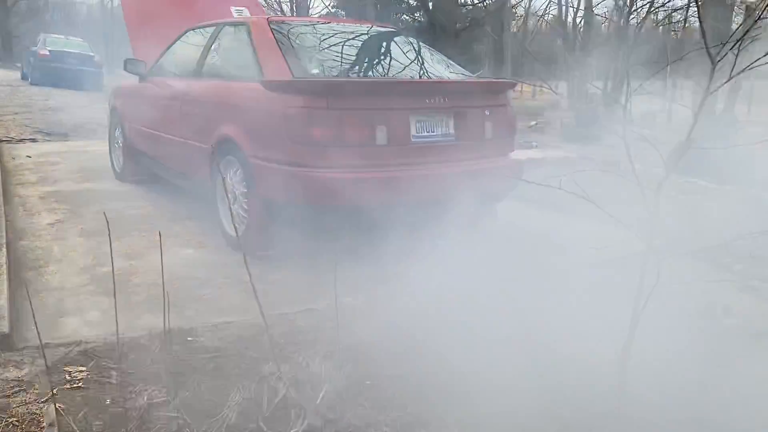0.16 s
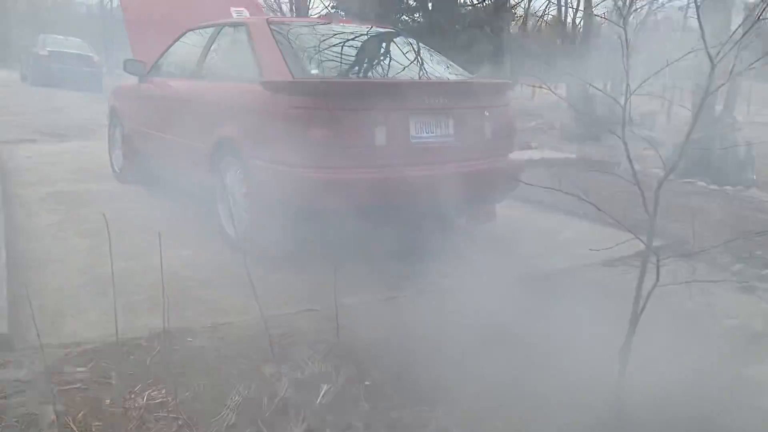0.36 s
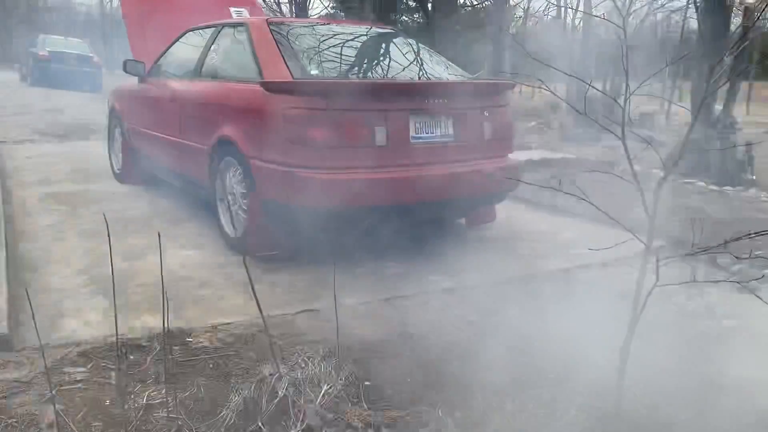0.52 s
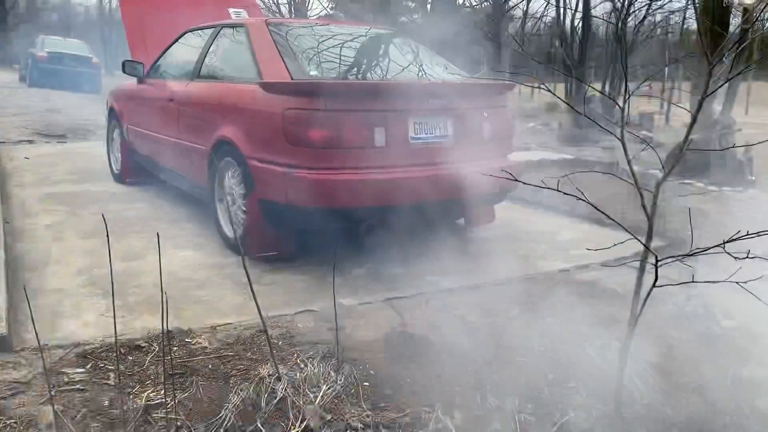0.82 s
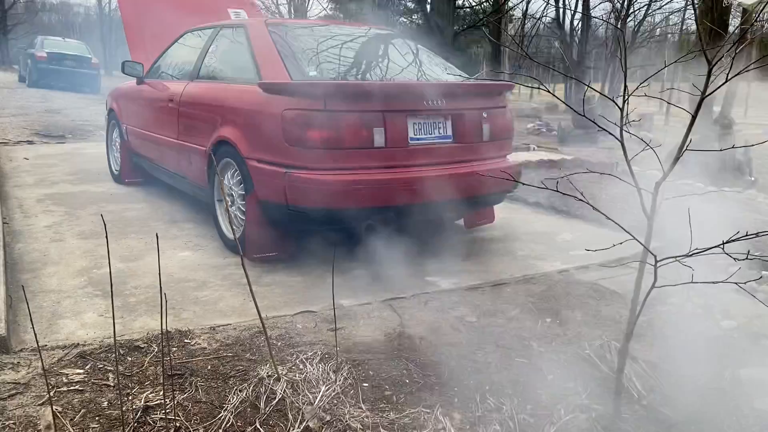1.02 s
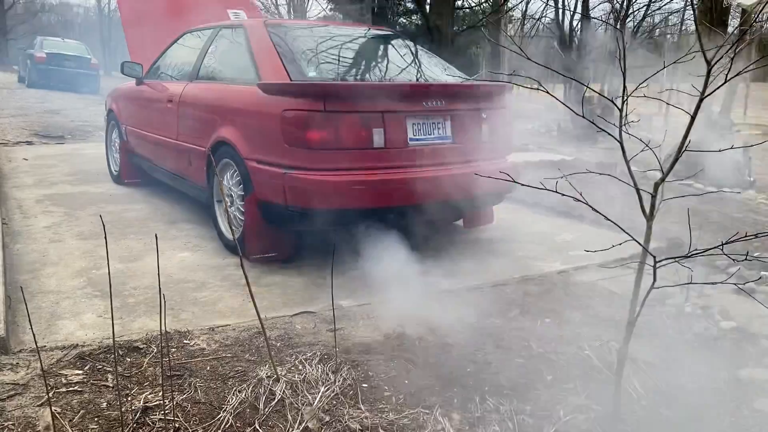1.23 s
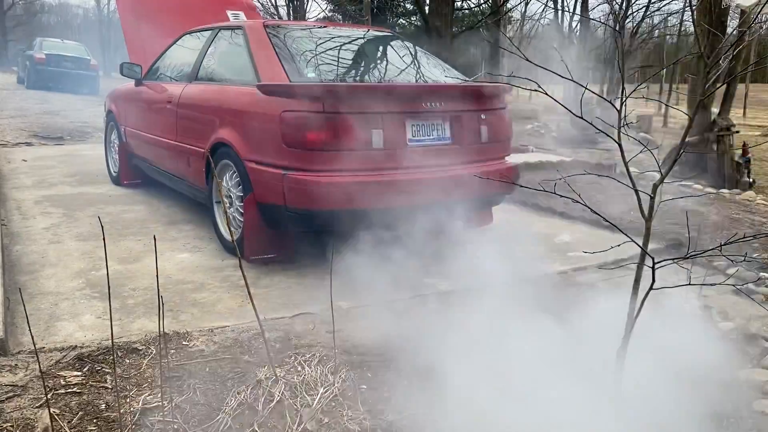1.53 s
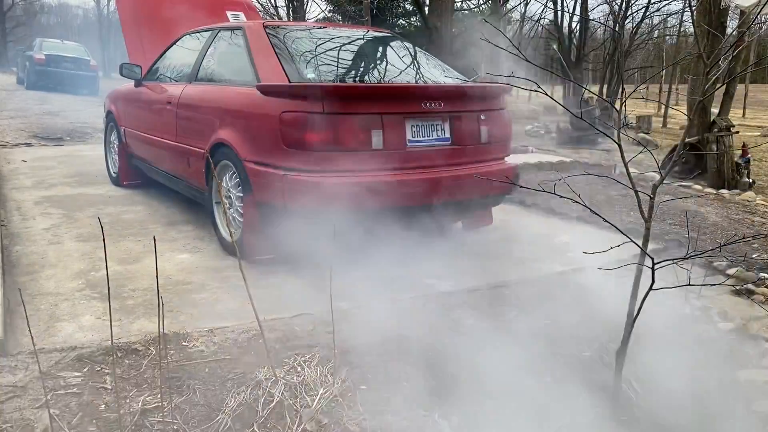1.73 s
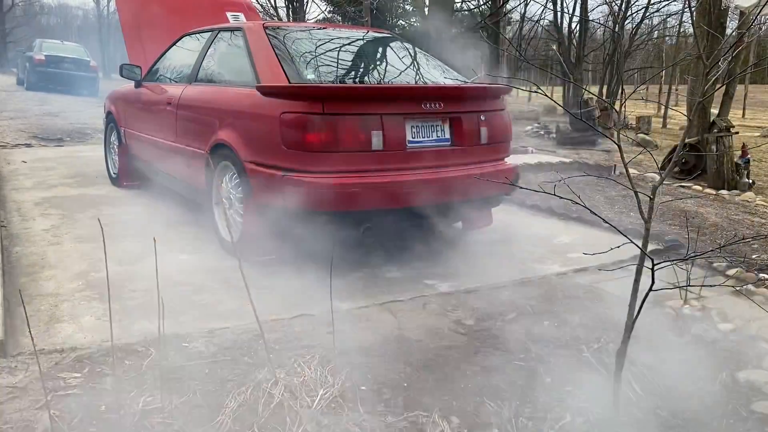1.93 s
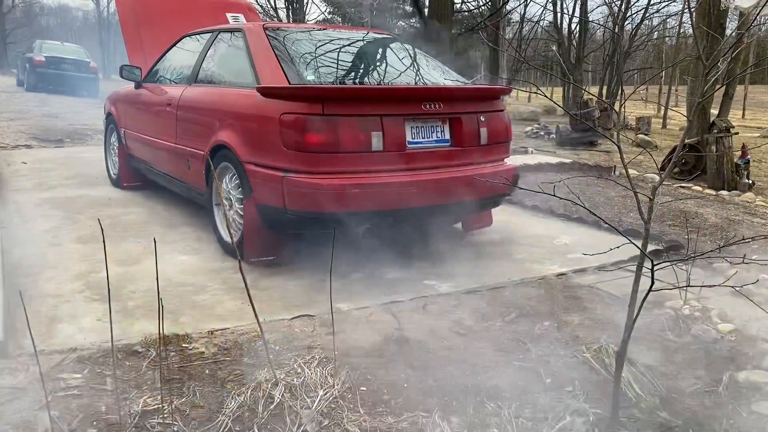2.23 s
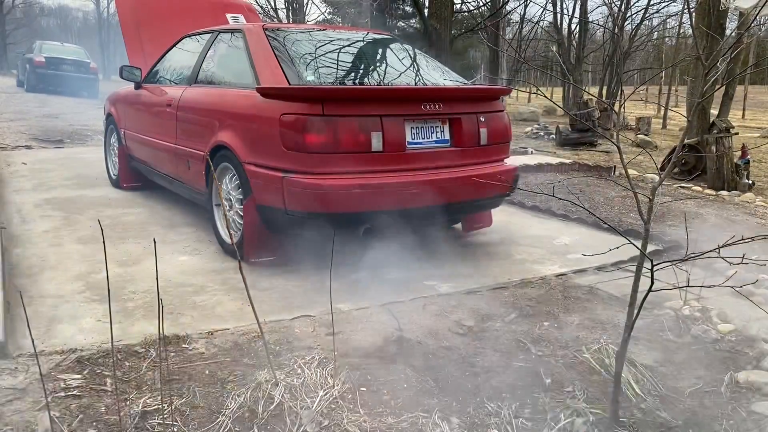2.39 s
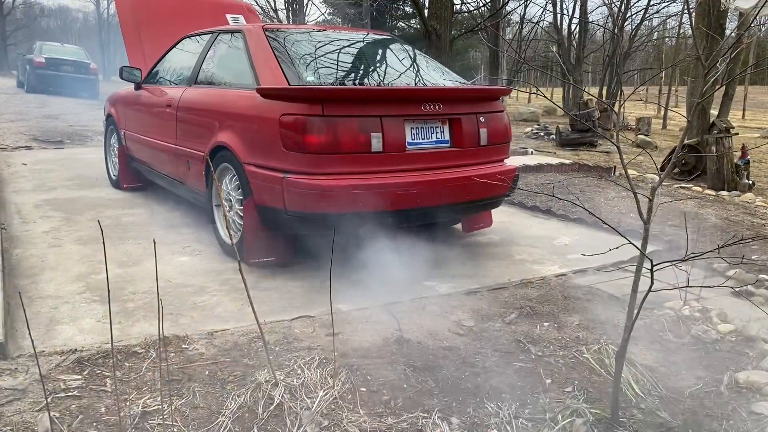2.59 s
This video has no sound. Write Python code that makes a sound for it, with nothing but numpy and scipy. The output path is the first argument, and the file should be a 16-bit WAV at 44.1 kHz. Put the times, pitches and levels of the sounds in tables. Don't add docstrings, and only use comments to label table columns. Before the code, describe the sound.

A five-cylinder car engine revs twice outdoors, its deep exhaust booming, crackling and popping behind the car

```python
import sys
import numpy as np
from scipy import signal
from scipy.fft import rfft, irfft, next_fast_len
from scipy.io import wavfile
from scipy.ndimage import uniform_filter1d, map_coordinates

SR = 44100
rng = np.random.default_rng(int(sys.argv[2]) if len(sys.argv) > 2 else 0)


def amplitude_ratio(level_db):
    exponent = np.asarray(level_db, float) / 20
    return 10 ** exponent


def store_pcm(level_fs):
    pcm = np.round(np.clip(level_fs, -1, 1) * 32767).astype(np.int16)
    wavfile.write(sys.argv[1], SR, np.atleast_2d(pcm).T)


N = 121275
CYLINDERS = 5

# time_s, firing_rate_hz, boom_db, overtone_db, rasp_db, burble_db
ENGINE = [(0, 124.2, -7.5, -20.5, -33, -17.5), (.15, 136, -8.5, -14, -36.5, -23.5),
          (0.329, 152.5, -10, -21.5, -40, -18.5), (.54, 171.2, -8, -18, -40, -18.5),
          (0.63, 175.8, -15, -15, -51, -19.5), (.77, 169.1, -20, -22.5, -57, -18.5),
          (.86, 158.1, -15, -28.5, -52.5, -22.5), (1.001, 147.2, -10.5, -30.5, -52, -25.5),
          (1.202, 133.2, -11.5, -23, -59.5, -30), (1.314, 123.3, -30.5, -32.5, -65.5, -39.5),
          (1.341, 120.5, -19, -26.5, -39.5, -22.5), (1.479, 126.6, -7, -17.5, -40, -18),
          (1.68, 140.7, -9, -17, -39, -20), (2.05, 169, -9.5, -21, -37.5, -19),
          (2.152, 173.8, -16, -13, -54, -19), (2.301, 161.6, -22.5, -22, -57, -22),
          (2.439, 150.4, -10.5, -30.5, -55.5, -24.5), (2.75, 125.9, -11.5, -23, -57, -30)]
# pitch_hz, width_hz, level_db
PIPE = [(67.6, 52, -5), (134, 42, -19), (195, 22, -12.5), (273.5, 18, -10.5), (347, 34, -2.5), (553, 67, 0),
        (606.6, 68, 1), (745, 32.3, 6), (843, 121, -2.5), (1034, 110, -9.5), (1270, 204, -11)]
# pitch_hz, width_hz, level_db
TAIL = [(741, 66, 19.5), (868, 170, 8.5), (986, 100, 1), (1317, 133, 13), (1992, 86, 12), (2686, 187, 6.5),
        (2945, 280, -1.5), (3480, 444, -1.5), (4790, 870, -12), (5150, 180, -26.5), (5546, 240, -10),
        (6420, 92, -11.5), (8200, 6000, -19.5)]
# pitch_hz, level_db
ORDER_PIPE = [(60, -0.5), (200, 3.5), (235, -7.5), (280, 0.5), (350, -3), (440, -8), (520, -2), (680, -9)]


def unit(x):
    return x / np.sqrt(np.mean(x ** 2) + 1e-20)


def along(points, hz):
    f, v = np.transpose(points)
    return np.interp(np.log(hz + 1), np.log(f + 1), v)


def wobble(rate):
    knots = rng.standard_normal(int(N * rate / SR) + 4)
    return map_coordinates(knots, [np.arange(N) * rate / SR])


def filtered(x, response):
    x, edge = np.asarray(x), 2000
    x = np.pad(x, [(0, 0)] * (x.ndim - 1) + [(edge, edge)], "reflect", reflect_type="odd")
    x = x * signal.windows.tukey(N + 2 * edge, 2 * edge / (N + 2 * edge))
    m = next_fast_len(N + SR // 2)
    return irfft(rfft(x, m) * response(np.fft.rfftfreq(m, 1 / SR)), m)[..., edge:edge + N]


def resonant(x, peaks):
    def response(f):
        total = 0
        for k, (center, width, db) in enumerate(peaks):
            peak = 1j * f * width / (center ** 2 - f ** 2 + 1j * f * width)
            total = total + (-1) ** k * amplitude_ratio(db) * peak
        return total
    return filtered(x, response)


def puffs(blows, t60):
    t = np.arange(SR // 20) / SR
    shape = amplitude_ratio(-60 * t / t60) * (1 - np.exp(-t / 0.00089))
    return np.abs(signal.fftconvolve(blows, shape)[:N]) * rng.standard_normal(N)


def yard(x):
    # pitch_hz, t60_s
    fading = [(200, 0.13), (2000, 0.18), (10000, 0.019)]
    # pitch_hz, level_db
    loudness = [(200, -30), (700, -24), (2000, -16), (6000, -10)]
    hz, t, z = signal.stft(rng.standard_normal((2, SR // 2)), SR, nperseg=256)
    tail = signal.istft(z * amplitude_ratio(-60 * t / along(fading, hz)[:, None]), SR, nperseg=256)[1]
    tail = tail / np.linalg.norm(tail[0])
    late = np.pad(x, (300, 0))[None]
    wet = signal.fftconvolve(late, tail, axes=1)[:, :N]
    return filtered(wet, lambda f: amplitude_ratio(along(loudness, f)))


def ground(x):
    echo_s, left_lag_s = .00143, .00005
    # pitch_hz, level_db
    direct_left = [(350, 0.2), (600, 0), (1000, -8.5), (1500, -3), (4500, -4), (7000, -14)]
    echo_left = [(150, -30), (450, -13), (700, -6.5), (1500, -4), (4500, -6), (7000, -9)]
    echo_right = [(150, -30), (450, -11), (700, -4.5), (1500, -5), (4500, -7), (7000, -10)]

    def response(f):
        echo = np.exp(-2j * np.pi * f * echo_s)
        left = amplitude_ratio(along(direct_left, f)) - amplitude_ratio(along(echo_left, f)) * echo
        right = 1 - amplitude_ratio(along(echo_right, f)) * echo
        return np.array([left * np.exp(-2j * np.pi * f * left_lag_s), right])
    return filtered(x, response)


def bay():
    # pitch_hz, level_db
    clatter = [(600, -37), (1500, -2.5), (4000, -3.5), (6000, -4), (8000, -7), (15000, -12)]
    s, hz, boom_db = np.transpose(ENGINE)[:3]
    hiss = filtered(rng.standard_normal((2, N)), lambda f: amplitude_ratio(along(clatter, f)))
    effort_db = 0.1627 * (hz - 150) + 0.25 * (boom_db + 16)
    effort_db = np.interp(np.arange(N) / SR, s, effort_db)
    return amplitude_ratio(-45 + effort_db + 2.7 * wobble(77)) * unit(hiss)


def blows_at(events, gain_db=0):
    blows = np.zeros(N)
    for s, db in events:
        blows[round(s * SR)] = amplitude_ratio(db + gain_db)
    return blows


def thumps():
    # start_s, level_db, pitch_hz, t60_s
    pushes = [(1.3355, -1, 86, .1), (1.3305, -4, 175, .05), (1.326, -6, 900, .02), (1.328, -8, 400, .03),
              (1.346, -9, 75, .1), (.757, -15, 770, .08), (.786, -14, 800, .06), (.768, -14, 335, .2),
              (.775, -14, 205, .15), (.803, -13, 420, .05), (.856, -6, 165, .05), (.828, -8, 125, .08),
              (.858, -12, 70, .1), (2.272, -11, 100, .08), (2.305, -13, 205, .15), (2.325, -11, 205, .2),
              (2.31, -13, 65, .15), (2.362, -8, 100, .09), (2.3, -15, 335, .15), (2.345, -14, 365, .15),
              (1.27, -24, 205, .2), (2.408, -17, 880, .06), (2.3985, -2, 150, .03), (2.4315, -2, 140, .04),
              (2.44, -15, 65, .15), (2.382, -10, 130, .06), (2.385, -15, 270, .15), (2.44, -16, 205, .25),
              (2.26, -15, 140, .1), (1.36, -12, 210, .1), (1.39, -13, 310, .2), (1.43, -15, 285, .2),
              (.8, -15, 205, .15)]
    t, out = np.arange(SR // 5) / SR, np.zeros(N + SR)
    for s, db, hz, t60 in pushes:
        swell = 1 - np.exp(-t / 0.00092)
        out[round(s * SR):][:len(t)] += amplitude_ratio(db - 60 * t / t60) * np.sin(2 * np.pi * hz * t) * swell
    snaps = blows_at([(s, db) for s, db, hz, t60 in pushes], -18)
    return out[:N] + amplitude_ratio(17.0) * resonant(puffs(snaps, 0.029), PIPE)


def crackle():
    # start_s, peak_db
    cracks = [(0.0423, -7.5), (0.0834, -18.5), (0.0967, -15.5), (0.1582, -13.5), (0.1945, -14.5),
              (0.2302, -16), (0.2622, -23), (0.3144, -27), (0.3436, -20), (0.3774, -17), (0.3953, -18.5),
              (0.407, -22), (0.4198, -26), (0.4374, -11), (0.4681, -25), (0.4862, -21.5), (0.5267, -15),
              (0.5584, -29.5), (0.5852, -20.5), (1.3264, -6.5), (1.355, -12.5), (1.3659, -16.5),
              (1.3728, -18), (1.3834, -15.5), (1.3984, -15), (1.416, -19), (1.424, -11.5), (1.4304, -17.5),
              (1.4377, -20.5), (1.4548, -21), (1.4623, -14.5), (1.4706, -19), (1.4874, -20.5),
              (1.505, -17.5), (1.5404, -17), (1.5848, -31.5), (1.5914, -16), (1.6192, -24), (1.6666, -17.5),
              (1.6888, -13), (1.7609, -15), (1.8258, -29), (1.8976, -18), (1.9332, -16.5), (1.9524, -13),
              (1.9614, -24), (1.9969, -9.5), (2.0818, -20.5), (2.3644, -27.5), (2.415, -29.5),
              (2.455, -44.5)]
    # start_s, level_db
    flames = [(.01, -32), (0.042, -26.5), (0.14, -30.5), (0.193, -34.5), (.39, -37.5), (.45, -37.5),
              (0.501, -37), (1.327, -24), (1.345, -23), (1.943, -23), (1.962, -23)]
    spits = puffs(blows_at(flames), .05)
    spits = filtered(spits, lambda f: (1j * f / (6000 + 1j * f)) ** 2)
    return spits + amplitude_ratio(13.5) * resonant(puffs(blows_at(cracks, 1), .0072), TAIL)


def boom(hz, turn, boom_db, overtone_db):
    # start_s, end_s, level_db
    misfires = [
        (.785, .826, -8),
        (.846, .857, -9),
        (1.345, 1.39, -5),
        (2.295, 2.38, -9),
        (2.39, 2.408, 4),
        (2.41, 2.428, -10),
    ]
    # multiple of the firing rate, level_db under the second tone
    harmonics = [(3, -11.5), (4, -21), (5, -19)]
    missing_db, n = np.zeros(N), np.arange(N)
    for start, end, db in misfires:
        missing_db += db * ((n > start * SR) & (n < end * SR))
    boom_db = boom_db + uniform_filter1d(missing_db, size=300)
    tone = amplitude_ratio(boom_db + .5 * wobble(23)) * np.sin(turn)
    second_db = overtone_db + 0.48 * uniform_filter1d(missing_db, size=600) + 1.8 * wobble(39.9)
    tone += amplitude_ratio(second_db) * np.sin(2 * turn + 4.3)
    for k, db in harmonics:
        level_db = overtone_db + db + along(ORDER_PIPE, k * hz) + 2.5 * wobble(20)
        tone += amplitude_ratio(level_db) * np.sin(round(k) * turn + 2 * np.pi * rng.random())
    return tone


def uneven_cylinders(hz, turn, rasp_db, burble_db):
    orders = [(2, -4.5), (3, -5), (4, 1.5), (6, 0), (7, -5), (8, 5.5), (9, -2), (11, -6), (12, -1.5),
              (13, -3), (14, -3), (15, 2), (16, -6), (17, -7), (18, -4.5), (19, 1), (20, -6.5)]
    total = np.zeros(N)
    for k, db in orders:
        effort_db = 0.036 * max(k - 8, 0) * (burble_db + 26)
        level_db = db + effort_db + along(ORDER_PIPE, k * hz / CYLINDERS) + 3.5 * wobble(8.91)
        total += amplitude_ratio(level_db) * np.sin(round(k) * turn / CYLINDERS + 2 * np.pi * rng.random())
    return amplitude_ratio(0.37 * (burble_db + 25.5) + 0.084 * (rasp_db + 32.5) - 33) * total


def burble(firing, luck):
    steady, muffler_hz = .45, 1540
    kicks = firing * (luck + steady) * amplitude_ratio(1.5 * wobble(29.83))
    sound = resonant(unit(kicks) + 1.1 * unit(puffs(firing, .012)), PIPE)
    return unit(filtered(sound, lambda f: 1 / (1 + 1j * f / muffler_hz) ** 2))


def rasp(firing, luck, rasp_db):
    clicks = firing * amplitude_ratio(1.5 * luck)
    gas = unit(puffs(clicks, 3 * .0034)) + .28 * rng.standard_normal(N)
    gas = amplitude_ratio(rasp_db) * unit(gas + .45 * unit(clicks))
    return amplitude_ratio(16) * resonant(gas, TAIL)


def exhaust():
    s, *columns = np.transpose(ENGINE)
    curves = [np.interp(np.arange(N) / SR, s, c) for c in columns]
    hz, boom_db, overtone_db, rasp_db, burble_db = curves
    fired = np.cumsum(uniform_filter1d(hz, size=2000)) / SR
    turn = 2 * np.pi * fired
    count = np.floor(fired + 1 - .4)
    firing = np.diff(count, prepend=0)
    luck = np.clip(rng.standard_normal((500, 2)), -2, 2)[count.astype(int)]
    tones = boom(hz, turn, boom_db, overtone_db) + uneven_cylinders(hz, turn, rasp_db, burble_db)
    noises = amplitude_ratio(burble_db) * burble(firing, luck[:, 0]) + rasp(firing, luck[:, 1], rasp_db)
    return np.sqrt(2) * tones + noises


def scene():
    pipe, hiss = exhaust() + thumps() + crackle(), bay()
    scattered = amplitude_ratio(-8) * hiss[::-1] * [[1], [-1]]
    return ground(pipe + hiss[0]) + yard(pipe) + scattered


def low_pass(x):
    return signal.sosfilt(signal.butter(12, 16830, fs=SR, output="sos"), x)


def record(dry):
    # pitch_hz, level_db
    mid_top = [(8000, -0.5), (8350, -13.5), (9350, -14.5), (9700, -2.5), (12000, -4), (12400, -25),
               (14300, -26), (14700, -12)]
    side_top = [(4000, -1), (8000, -2), (9300, -5), (10300, -16), (10700, -27), (12000, -25), (12600, -10),
                (14300, -8), (14700, -28)]
    low_hz, top_hz, edge_s = 50, 15800, .003
    ceiling, knee = 1.05, 4
    x = filtered(dry, lambda f: (1j * f / (low_hz + 1j * f)) ** 3)
    x = x / (1 + np.abs(x / ceiling) ** knee) ** (1 / knee)
    mid, side = filtered([x[0] + x[1], x[0] - x[1]],
                         lambda f: amplitude_ratio([along(mid_top, f), along(side_top, f)]) * (f < top_hz))
    fade = signal.windows.tukey(N, 2 * edge_s * SR / N)
    return low_pass(fade * np.array([mid + side, mid - side]) / 2)


dry = scene()
out = record(dry)
store_pcm(out)
```